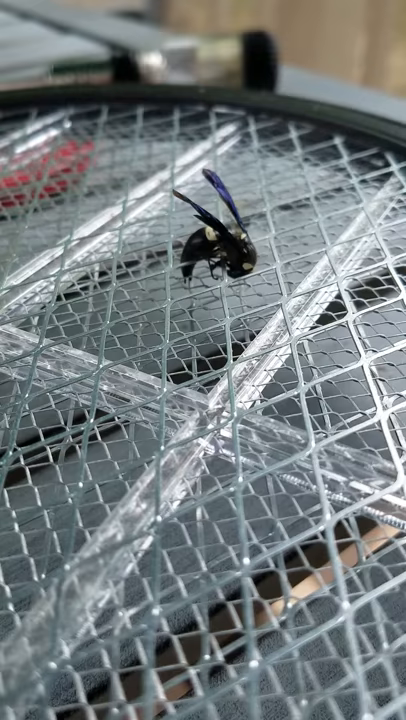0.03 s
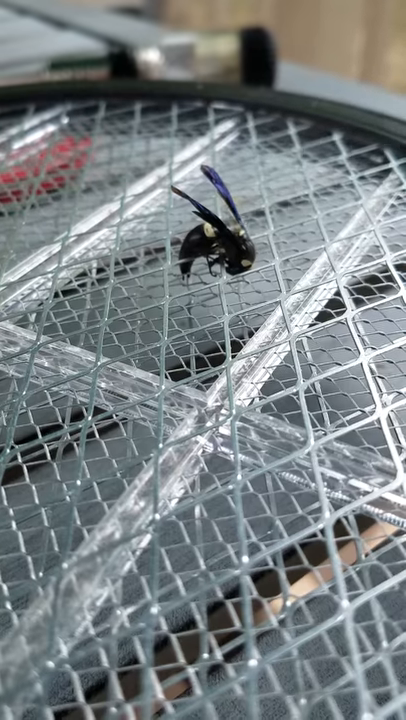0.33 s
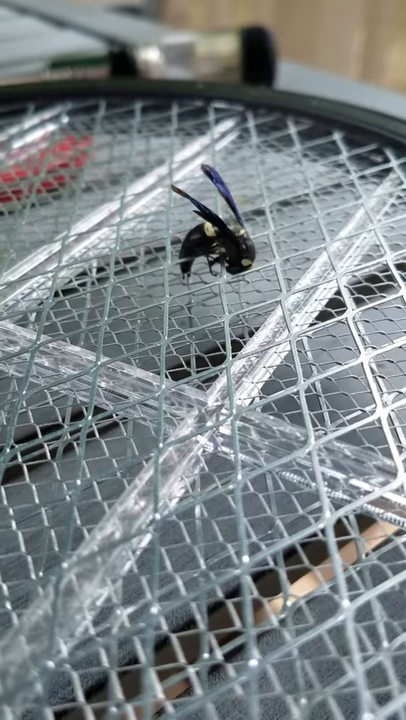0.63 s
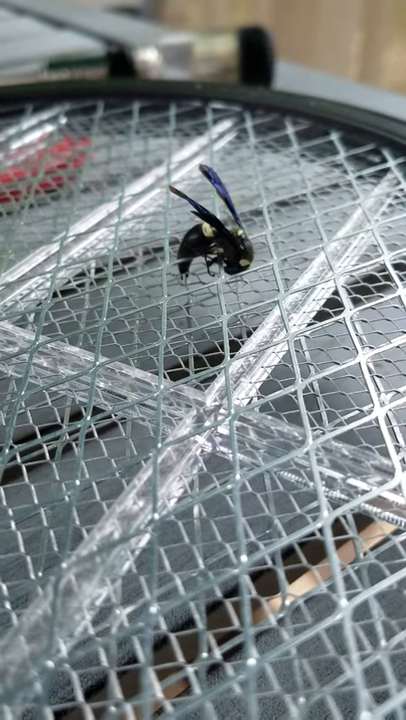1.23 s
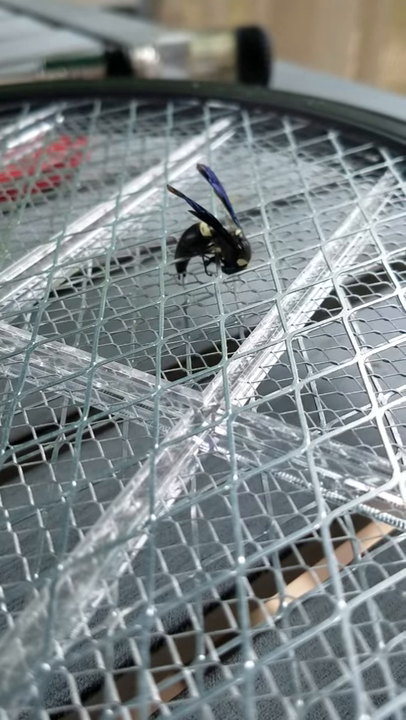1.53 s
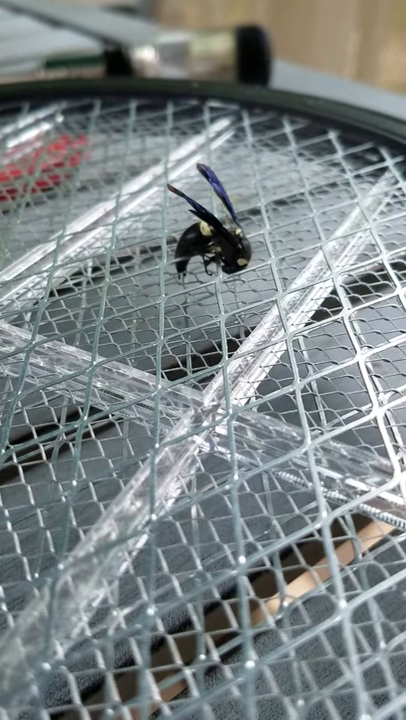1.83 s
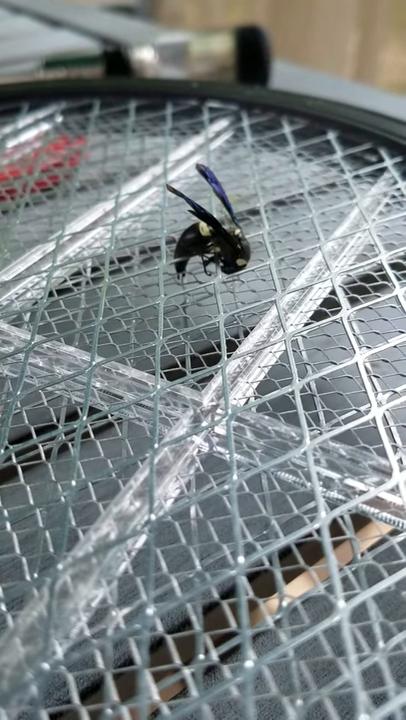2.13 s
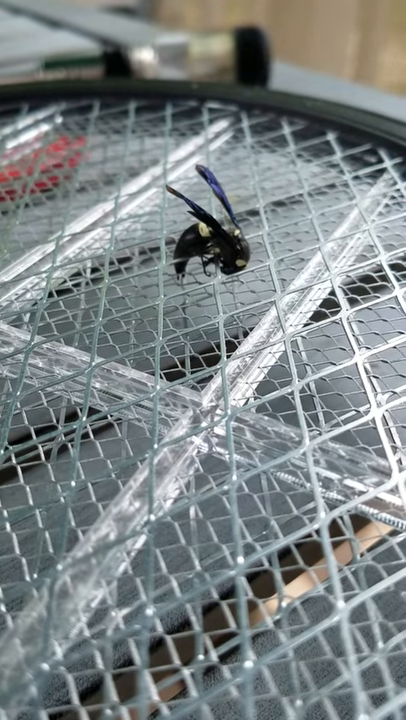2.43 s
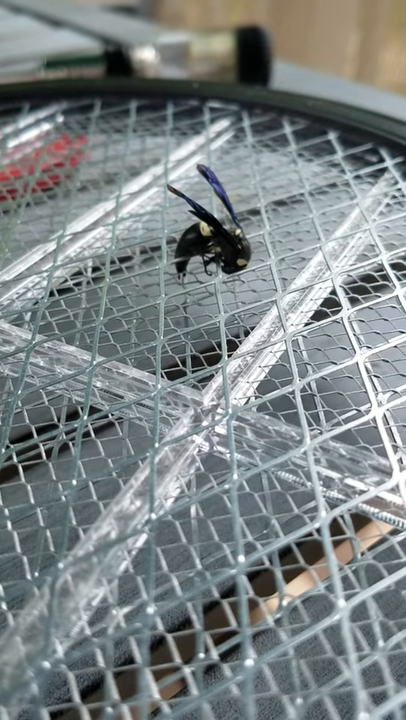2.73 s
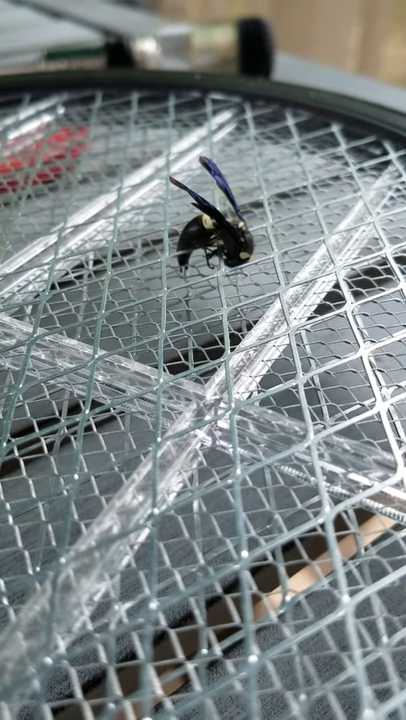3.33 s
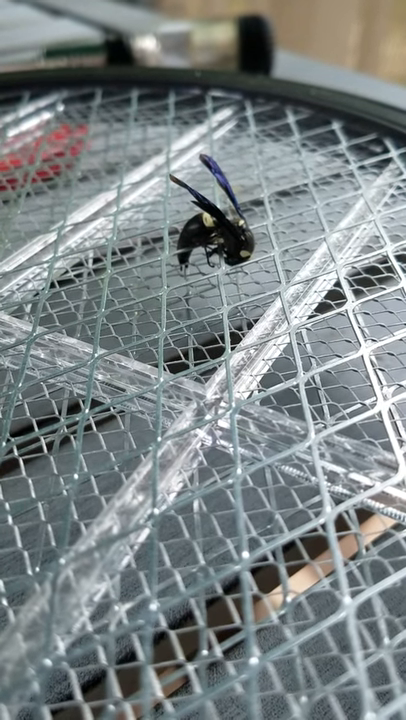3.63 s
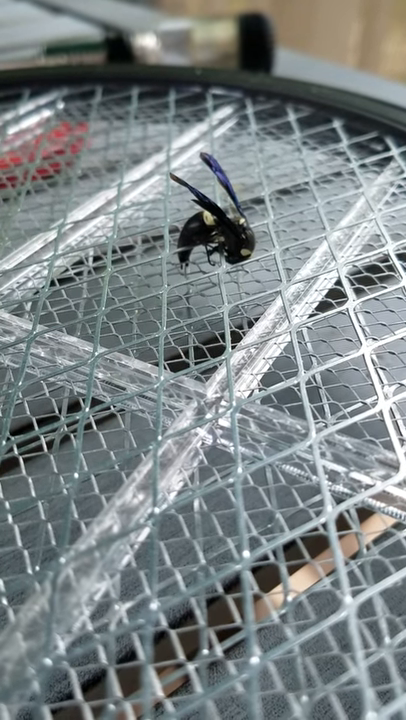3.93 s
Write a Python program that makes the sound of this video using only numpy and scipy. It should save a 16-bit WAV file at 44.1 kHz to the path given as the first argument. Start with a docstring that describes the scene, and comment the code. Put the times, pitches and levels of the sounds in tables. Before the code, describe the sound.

Electric swatter zapping an insect: one loud pop, then short snaps over a faint whine.

```python
"""Wasp on an electric fly swatter.

A wasp lies on the live mesh, close up. The converter whines, unsteady while current leaks through
the insect; two arcs sizzle and dry sparks snap, ringing the mesh. A distant machine hums and
rumbles underneath. The sound fades in, with one loud electrical pop on the right."""
import sys
import numpy as np
from scipy import signal
from scipy.fft import rfft, irfft
from scipy.io import wavfile
from scipy.ndimage import uniform_filter1d

SR = 44100
rng = np.random.default_rng(int(sys.argv[2]) if len(sys.argv) > 2 else 0)


def digitize_waveform(pressure):
    """Quantize a signal to 16-bit integers and store it at the path in sys.argv[1].

    Rows of a 2-D input are taken as channels; values are limited to [-1, 1].
    """
    field = np.atleast_2d(pressure).T
    bounded = np.clip(field, -1, 1)
    quanta = np.round(bounded * 32767).astype(np.int16)
    wavfile.write(sys.argv[1], SR, quanta)


N = 176400
TIME, FREQS = np.arange(N) / SR, np.fft.rfftfreq(N, 1 / SR)

# converter pitch: time_s, pitch_hz
WHINE_PITCH = [(.14, 10600), (.36, 10900), (.49, 10850), (.55, 11020), (.63, 10870), (.72, 10960),
               (.79, 11150), (.85, 10970), (.93, 10900), (1.05, 11080), (1.1, 10720), (1.19, 10680),
               (1.32, 11000), (1.38, 10880), (1.415, 11130), (1.435, 10600), (1.49, 10700), (1.54, 10780),
               (1.57, 11200), (1.62, 11100), (1.66, 10960), (1.7, 11040), (1.73, 11300), (1.77, 11240),
               (1.81, 10820), (1.86, 11050), (1.89, 10380), (1.92, 10900), (2.02, 11060), (2.15, 11000),
               (2.24, 11220), (2.3, 11000), (2.37, 11200), (2.45, 10950), (2.5, 11190), (2.61, 11210),
               (2.68, 10950), (2.72, 11220), (2.8, 11210), (2.85, 11040), (2.89, 11100), (2.93, 11000),
               (2.97, 11200), (3.11, 11200), (3.15, 11100), (3.18, 10720), (3.45, 10670), (3.7, 10680),
               (3.78, 10630), (4, 10650)]
# converter loudness and unsteadiness: time_s, level_db, jitter_hz
WHINE_LOAD = [(.14, -70.5, 17), (.45, -76, 45), (.55, -71.5, 43), (1.05, -70, 60), (1.15, -70.5, 30),
              (1.35, -74, 150), (1.5, -68, 60), (1.7, -74.5, 91), (1.85, -72.5, 61), (2.1, -70.5, 55),
              (3.13, -72, 54), (3.23, -63, 14), (3.48, -64, 12), (3.53, -67, 16), (3.69, -61, 17),
              (3.77, -73, 30), (4, -68.5, 18)]
# brief leaks that flick the whine upward: time_s, rise_hz
LEAKS = [(3.198, 311), (3.313, 478), (3.59, 220), (3.623, 525), (3.726, 450)]
# arc envelopes: peak_s, level_db, swell_s, hold_s, fade_s
ARC_SHAPES = [(2.382, -44, 0.0013, .028, 0.018), (2.996, -42.5, 0.014, 0.026, 0.021)]
# flares inside the arcs: start_s, level_db, decay_s
ARC_FLARES = [(2.3845, -43, 0.0025), (2.388, -35, 0.0037), (2.393, -36, .002), (2.986, -47, .002),
              (2.9934, -38, 0.0013), (2.9991, -33.5, 0.0025), (3.0025, -34, 0.0011), (3.011, -43, .003)]
# sizzle tone: freq_hz, gain_db
ARC_EQ = [(1200, -1.5), (2400, -2), (3500, -3.5), (5000, -3.5), (5900, -6.5), (8600, -6.5), (11800, -5),
          (14000, -4), (15800, -4)]
# mesh resonances under the arcs: freq_hz, width_hz, gain_db
MESH_MODES = [(2510, 180, -11), (4250, 150, -0.5), (5200, 200, -6)]
# dry sparks: start_s, level_db, tilt_db_per_octave, left_minus_right_db, ring_hz, ring_db
SPARKS = [(0.3323, -41.5, -2, -15, 3200, 13), (1.0674, -44, 8, 0, 4000, 0),
          (1.4042, -35, 1.5, -15, 1700, -5), (2.7244, -40, -2, -11, 3000, 3),
          (3.4372, -27.5, 1, -5, 1400, -3), (3.5555, -39.5, -1, -9, 4040, 7)]
# spark tone: freq_hz, gain_db
SPARK_EQ = [(200, -21), (900, 4), (1600, 1.5), (3000, 5.5), (4500, -5), (8000, -7), (10000, -21),
            (13500, -11), (16000, -1)]
# machine hum, fundamental first: pitch_hz, left_db, right_db
HUM_PARTIALS = [(118.3, -59, -77), (236.5, -63.5, -71), (310.3, -62.5, -64.5), (358, -59.5, -62),
                (480, -62, -68), (712, -86, -60.5), (774, -77, -60.5), (830.5, -80, -58.5),
                (953, -63, -58.5), (1070, -59.5, -65), (1952, -80, -60)]
# second drone: time_s, level_db
DRONE_LEVEL = [(.3, -68), (1.2, -84), (1.7, -63), (3.2, -62), (4, -63.5)]
# low rumble: time_s, level_db
RUMBLE_LEVEL = [(.13, -47.5), (.36, -57), (.42, -48), (.58, -50.5), (.72, -54.5), (.85, -59), (.95, -78),
                (2.2, -66), (3.2, -57.5), (3.7, -63), (3.9, -54.5), (4, -57)]
# rumble tone: freq_hz, gain_db
RUMBLE_EQ = [(15, -16), (26, -10), (38, -8), (70, -7), (140, -5.5), (250, -6.5), (450, -9), (1000, -41),
             (4000, -89)]
# rough hum inside the rumble: time_s, level_db
ROUGH_HUM_LEVEL = [(.13, -50.5), (.28, -51), (.39, -55), (.44, -49.5), (.55, -50), (.67, -56), (.95, -95)]
# air tone on the left: freq_hz, gain_db
AIR_LEFT_EQ = [(20, -16), (70, -4), (150, -5.5), (270, -2.5), (490, 5), (700, 1.5), (1000, -0.5),
               (1250, -3), (1600, 0.5), (2000, -1.5), (2700, -9), (3800, -16.5), (5500, -22), (7500, -23),
               (9800, -22), (12500, -21), (15800, -27.5)]
# air tone on the right: freq_hz, gain_db
AIR_RIGHT_EQ = [(20, -23), (70, -9), (150, -2.5), (270, -5), (530, 6.5), (750, 0.5), (1000, 1),
                (1250, -3.5), (1650, 0), (2000, 2), (2700, -7), (3800, -17), (5500, -18.5), (7500, -20),
                (9800, -39), (12500, -30.5), (15800, -22.5)]
# slow swell of the air: time_s, gain_db
AIR_GAIN = [(.4, -2.5), (1, 0), (2, 1.53), (3, 0.5), (4, 1.2)]
# stereo image of the air: freq_hz, left_right_correlation
AIR_CORRELATION = [(60, 0.95), (130, 0.21), (290, 0.6), (640, 0.79), (1400, 0), (3000, 0.034), (15000, 0)]
# a faint click as the sound starts, then one loud electrical pop, both on the right: start_s, level_db
CLICK_AND_POP = [(0.1317, -40.5), (0.4038, -7.5)]

CUTOFF_HZ = 15880


def whine(pan_db=-13, duck_threshold_db=-60, flutter_db_per_hz=0.11, dip_db_per_hz=0.0386):
    """The converter's tone jitters with its load, dips on each leak and stalls during arcs."""
    jitter_hz = curve(WHINE_LOAD, column=2)
    jitter = jitter_hz * (0.9 * drift(rate_hz=28.3) + drift(rate_hz=182))
    flick_hz = sum(hz * bell(TIME, s, width=0.0041) for s, hz in LEAKS)
    tone = np.sqrt(2) * np.sin(phase_of(curve(WHINE_PITCH) + flick_hz + jitter))
    flutter_db = np.minimum(flutter_db_per_hz * jitter_hz, 3.5)
    flutter = amp([flutter_db * np.minimum(drift(rate_hz=61), 1) for _ in range(2)])
    level = amp(curve(WHINE_LOAD) - dip_db_per_hz * flick_hz)
    duck = 1 / (1 + arc_level() / amp(duck_threshold_db))
    return tone * flutter * level * duck * pan(pan_db)


def whistle(pitch_hz=14600, width_hz=170, level_db=-74, start_s=0.87, end_s=2.7):
    """The leaking current adds a thin whistle above the whine."""
    gate = uniform_filter1d(1. * ((TIME > start_s) & (TIME < end_s)), size=4000)
    return amp(level_db) * gate * noise_band(pitch_hz, width_hz, shape=(2, N))


def arcs(grains_per_s=14000, spread_db=1.5, flicker_db=1.4, low_cut_hz=1315):
    """Dense, flickering micro-discharges sizzle through the insect and ring the mesh."""
    grains = rng.choice([-1, 1], (2, N)) * (rng.random((2, N)) < grains_per_s / SR)
    strength = amp(spread_db * np.minimum(rng.exponential(1, (2, N)), 3))
    band = FREQS / np.hypot(FREQS, low_cut_hz) * (FREQS < CUTOFF_HZ)
    flicker = unit(amp(flicker_db * drift(rate_hz=220)))
    sizzle = arc_level() * flicker * colour(grains * strength, amp(spectrum(ARC_EQ)) * band)
    ring = 1 + sum(resonance(*mode) for mode in MESH_MODES)
    return irfft(rfft(sizzle) * ring, N)


def arc_level():
    """Each arc swells, flares, holds and dies away."""
    power = np.zeros(N)
    for s, db, swell, hold, fade in ARC_SHAPES:
        t = TIME - s
        power += (amp(db) * np.exp(np.minimum(t, 0) / swell - np.maximum(t - hold, 0) / fade)) ** 2
    for s, db, decay in ARC_FLARES:
        power += (amp(db) * burst(s, 0.00051, decay)) ** 2
    return np.sqrt(power)


def cracks(boost_db=2):
    """Each flare of an arc opens with a spark's sharp crack, dead centre."""
    strike = sum(amp(db + boost_db) * burst(s, 1 / SR, decay_s=0.00055) for s, db, _ in ARC_FLARES)
    return equalise(strike * rng.choice([-1, 1], N), amp(spectrum(SPARK_EQ)))


def snaps(rise_s=0.00052, tail_db=-13.5):
    """Each dry spark is a millisecond crack that rings the mesh briefly."""
    out = np.zeros((2, N))
    octaves = np.log2(np.maximum(FREQS, 500) / 3000)
    for s, db, tilt_db, pan_db, ring_hz, ring_db in SPARKS:
        ring = 1 + resonance(ring_hz, width_hz=1000, db=ring_db)
        gain = amp(spectrum(SPARK_EQ) + tilt_db * octaves) * ring
        envelope = burst(s, rise_s, decay_s=0.00077) + amp(tail_db) * burst(s, rise_s, decay_s=0.0065)
        crack = rng.choice([-1, 1], (2, N)) * envelope
        out += amp(db) * pan(pan_db) * equalise(crack, gain)
    return out


def echoes(x, level_db=-20, t60_s=0.38, predelay_s=.003):
    """Nearby surfaces throw back a weak, short tail."""
    t = TIME[:SR // 2]
    tail = rng.standard_normal((2, len(t))) * np.exp(-np.log(1000) * t / t60_s) * (t > predelay_s)
    return amp(level_db) * signal.fftconvolve(x, tail / np.linalg.norm(tail[0]), axes=1)[:, :N]


def click_and_pop(rise_s=.00007, recover_s=0.0014, tick_hz=14200, tick_db=-21):
    """A faint opening click, then an electrical pop: each a ticking pulse that swings back once."""
    right = np.zeros(N)
    for s, db in CLICK_AND_POP:
        t = np.maximum(TIME - s, 0)
        onset = 1 - bell(t, 0, width=rise_s)
        swing = 0.28 * bell(t, 0.0023, width=0.0034)
        tick = amp(tick_db) * burst(s, rise_s, decay_s=0.00011) * np.sin(2 * np.pi * tick_hz * t)
        right += amp(db) * (onset * (swing - np.exp(-t / recover_s)) + tick)
    return np.array([np.zeros(N), right])


def hum(waver_hz=1.17, flutter=0.23, drone_hz=187.8):
    """A distant mains-driven machine hums in wavering partials; a second drone swells in."""
    out = np.zeros((2, N))
    for hz, left_db, right_db in HUM_PARTIALS:
        phase = phase_of(hz + waver_hz * drift(rate_hz=4.15))
        tone = np.sin(phase + rng.uniform(-1.18, 1, (2, 1)))
        out += amp([[left_db], [right_db]]) * tone * (1 + flutter * drift(rate_hz=7.6))
    drone = np.sin(phase_of(drone_hz + 1.94 * drift(rate_hz=3.56)))
    return np.sqrt(2) * (out + amp(curve(DRONE_LEVEL)) * pan(db=-14.5) * drone)


def rumble(waver_hz=2.1, flutter=0.33):
    """Low rumble and a rough hum fill the first second; the rumble creeps back later."""
    noise = rng.standard_normal(N) + 0.58 * rng.standard_normal((2, N))  # centre plus width
    low_end = colour(noise, amp(spectrum(RUMBLE_EQ)))
    phase = phase_of(HUM_PARTIALS[0][0] + waver_hz * drift(rate_hz=15.3))
    rough_hum = np.sqrt(2) * np.sin(phase) * (1 + flutter * drift(rate_hz=25))
    return amp(curve(RUMBLE_LEVEL)) * low_end + amp(curve(ROUGH_HUM_LEVEL)) * rough_hum


def air(left_db=-48, right_db=-45, patch_db=0.84):
    """The machine's distant rush of air and faint hiss, in soft patches."""
    left, other = rng.standard_normal((2, N))
    alike = np.clip(spectrum(AIR_CORRELATION), -1, 1)
    right = irfft(alike * rfft(left) + np.sqrt(1 - alike ** 2) * rfft(other), N)
    bed = np.array([amp(left_db) * colour(left, amp(spectrum(AIR_LEFT_EQ))),
                    amp(right_db) * colour(right, amp(spectrum(AIR_RIGHT_EQ)))])
    bands = signal.stft(bed, nperseg=512)[2]
    patches = uniform_filter1d(rng.standard_normal(bands.shape[1:]), size=5, axis=0)  # over frequency
    patches = unit(uniform_filter1d(patches, size=10, axis=1))  # over time
    return signal.istft(bands * amp(patch_db * patches))[1][:, :N] * amp(curve(AIR_GAIN))


def amp(db):
    """Decibels to gain."""
    return 10 ** (np.asarray(db) / 20)


def unit(x):
    """Scales to rms 1."""
    return x / np.sqrt(np.mean(x ** 2) + 1e-20)


def curve(rows, column=1):
    """Joins breakpoints over time."""
    rows = np.array(rows)
    return np.interp(TIME, rows[:, 0], rows[:, column])


def spectrum(rows):
    """Joins breakpoints over log frequency."""
    hz, value = np.transpose(rows)
    return np.interp(np.log(FREQS + 1), np.log(hz + 1), value)


def colour(x, gain):
    """Applies an EQ and scales to rms 1."""
    return unit(irfft(rfft(x) * gain, N))


def equalise(x, gain):
    """Applies an EQ with an average power gain of 1."""
    return irfft(rfft(x) * gain / np.sqrt(np.mean(abs(gain) ** 2)), N)


def resonance(hz, width_hz, db):
    """Response of one ringing mode."""
    return amp(db) / (1 + 2j * (FREQS - hz) / width_hz)


def bell(x, centre, width):
    """Smooth bump, down to 1/e one width from its centre."""
    return np.exp(-((x - centre) / width) ** 2)


def noise_band(centre_hz, width_hz, shape=N):
    """Noise of rms 1 in a Gaussian band."""
    return colour(rng.standard_normal(shape), bell(FREQS, centre_hz, np.sqrt(2) * width_hz))


def drift(rate_hz):
    """Smooth random motion of rms 1."""
    return noise_band(0, rate_hz)


def phase_of(hz):
    """Running phase of a moving pitch."""
    return 2 * np.pi * np.cumsum(hz) / SR


def pan(db):
    """Stereo gains; positive leans left."""
    return amp([[db / 2], [-db / 2]])


def burst(start_s, rise_s, decay_s):
    """Quick attack, exponential decay."""
    t = np.maximum(TIME - start_s, 0)
    return np.minimum(t / rise_s, 1) * np.exp(-np.maximum(t - rise_s, 0) / decay_s)


def scene():
    """The swatter up close, the machine far away."""
    sparks = arcs() + cracks() + snaps()
    return sparks + echoes(sparks) + whine() + whistle() + hum() + air() + rumble()


def record(dry):
    """Fades in, adds the click and the pop, and trims the top end."""
    start_s, fade_s, start_db = .131, 0.37, -22
    fade = np.clip(amp(start_db) + (TIME - start_s) / fade_s, 0, 1) * (TIME > start_s)
    low_pass = signal.firwin(511, CUTOFF_HZ, window=("kaiser", 8), fs=SR)
    return signal.oaconvolve(dry * fade + click_and_pop(), low_pass[None], "same")


dry = scene()
out = record(dry)
digitize_waveform(out)
```